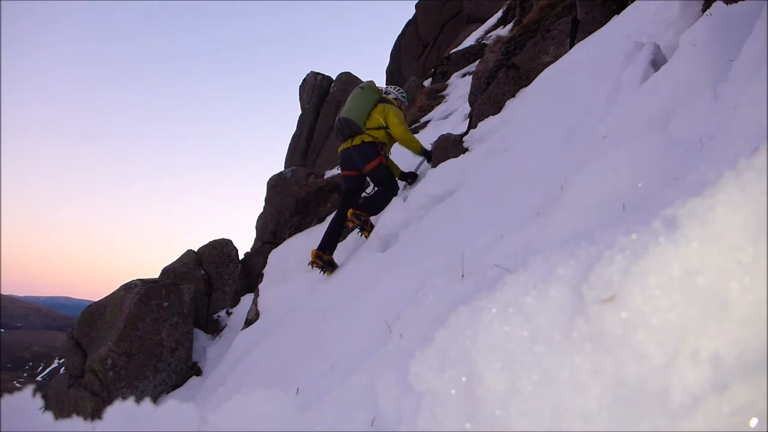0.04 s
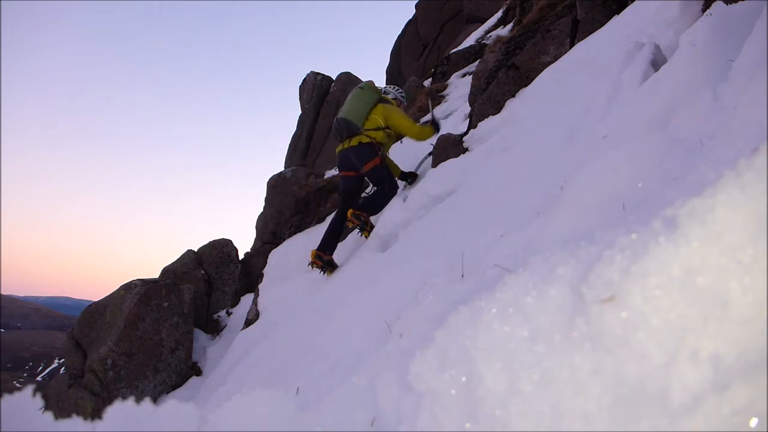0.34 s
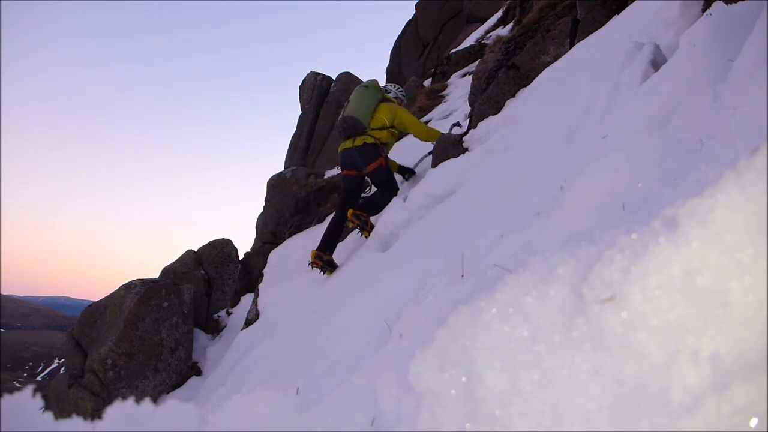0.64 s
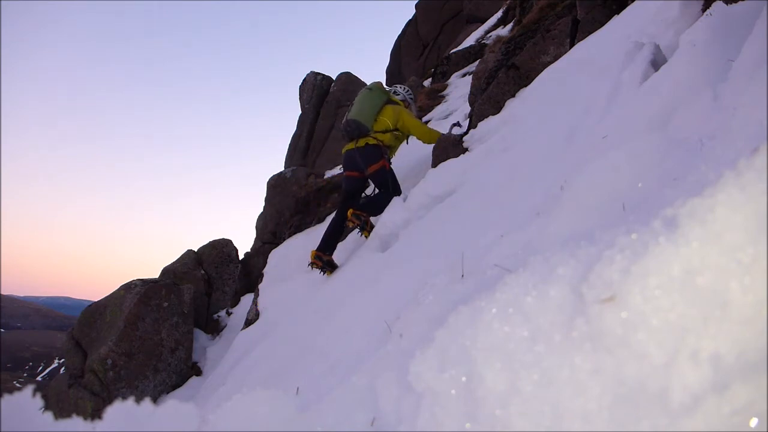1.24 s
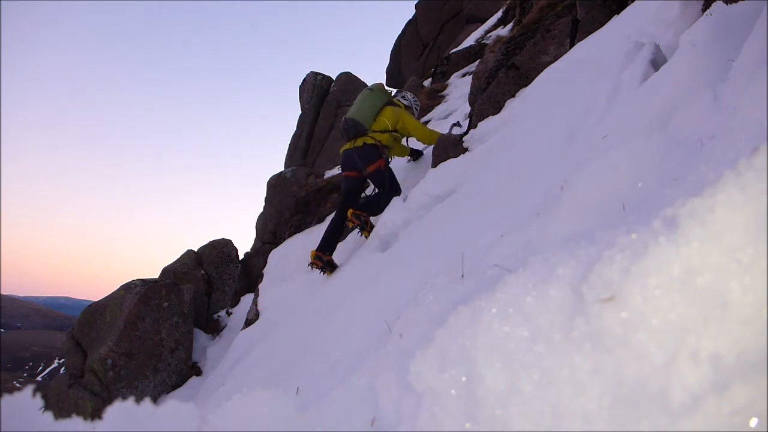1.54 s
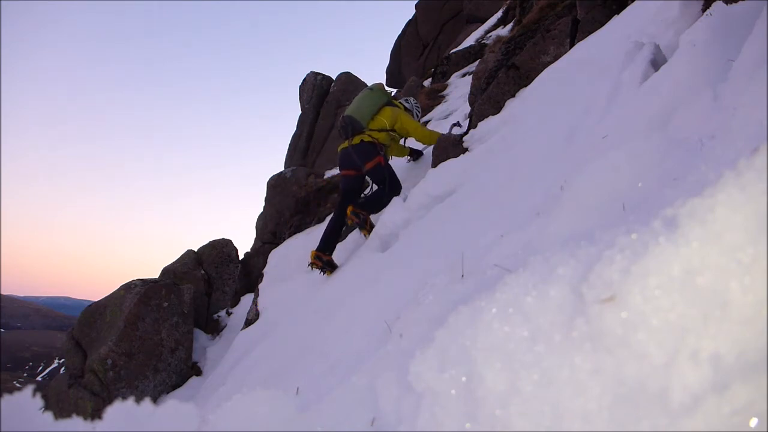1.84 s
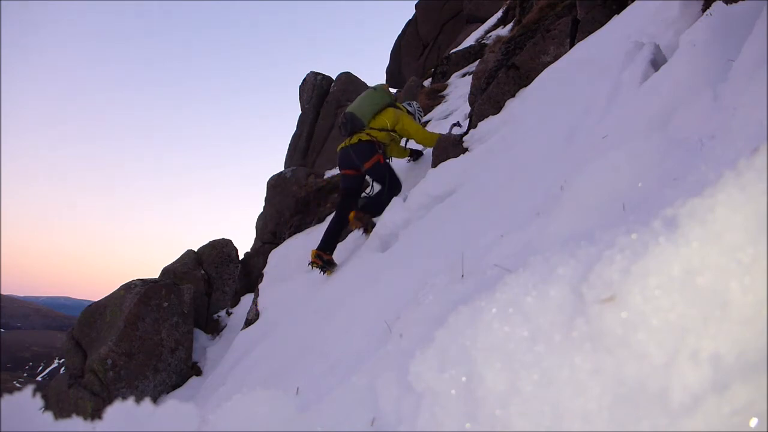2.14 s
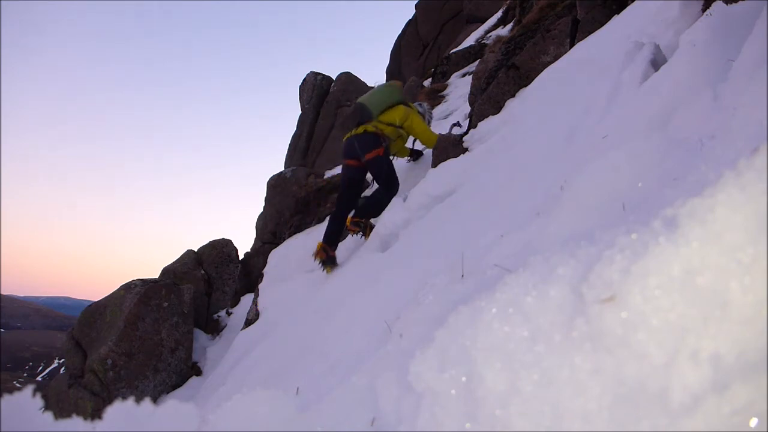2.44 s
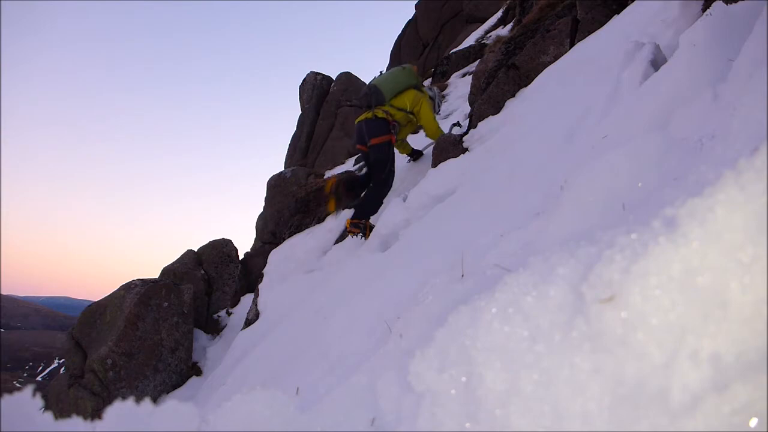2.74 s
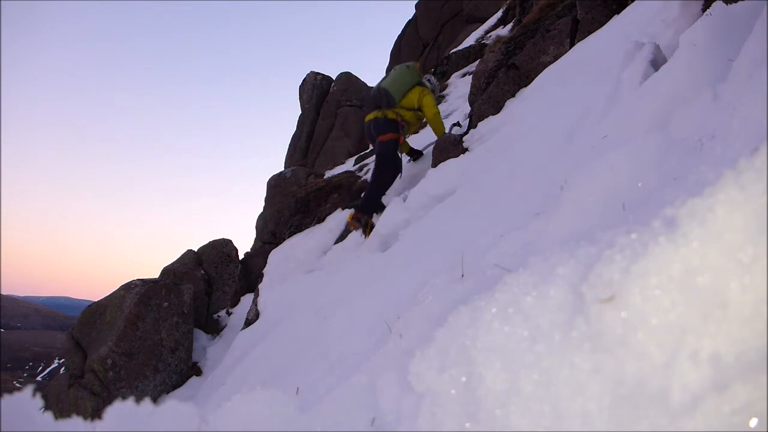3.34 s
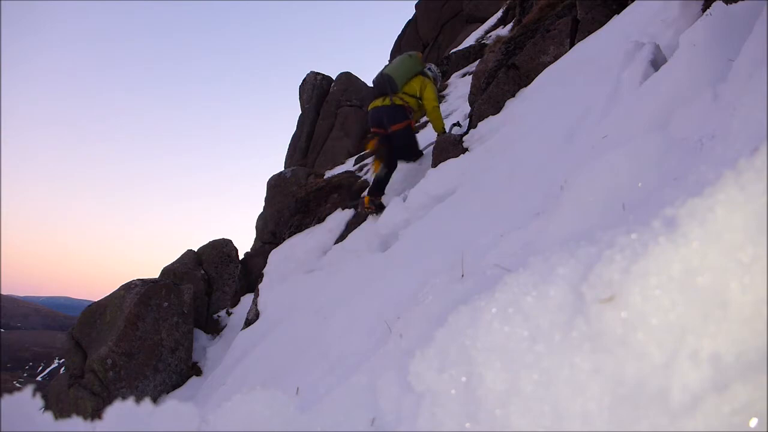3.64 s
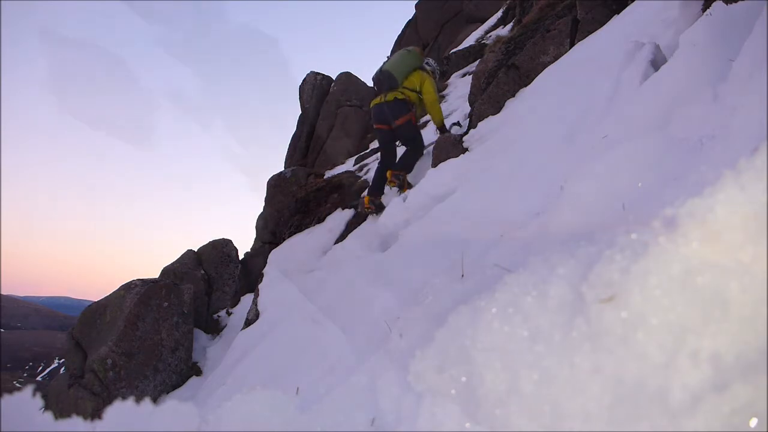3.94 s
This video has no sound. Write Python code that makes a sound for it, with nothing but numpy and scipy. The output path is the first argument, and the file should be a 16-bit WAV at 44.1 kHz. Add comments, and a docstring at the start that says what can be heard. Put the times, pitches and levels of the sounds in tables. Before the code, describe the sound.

Short crunches of an axe and boots climbing hard snow, with gusts thumping the microphone.

```python
"""Climbing firm snow in a gust

Some metres away axe picks bite, sleeves swish and crampons kick in. Each blow is a short run of
fractures in the crust that rings the steel. There are no walls to echo. Over a faint hush of
mountain air a gust arrives, and its eddies thump the two microphone ports."""
import sys
import numpy as np
from scipy import signal
from scipy.fft import rfft, irfft
from scipy.io import wavfile
from scipy.ndimage import uniform_filter1d

SR = 44100
rng = np.random.default_rng(int(sys.argv[2]) if len(sys.argv) > 2 else 0)


def wav_record(signal):
    """Record a signal, one row per channel, as 16-bit PCM in the file named by sys.argv[1]."""
    frames = np.transpose(np.atleast_2d(signal))
    bounded = np.clip(frames, -1, 1)
    # unit amplitude maps onto the largest positive 16-bit level
    quanta = np.round(bounded * 32767).astype(np.int16)
    wavfile.write(sys.argv[1], SR, quanta)


N = 176400

# Spectrum of distant wind. Each row: frequency in Hz, relative spectral level in dB.
AIR_SPECTRUM = [(30, -18.5), (90, -16), (170, -13.5), (320, -3.5), (500, -7.5), (1100, -13.5), (1500, -18),
                (2900, -25), (6000, -33.5), (10700, -35), (13000, -42.5), (15000, -43)]
# Stereo width of that wind. Each row: frequency in Hz, side minus mid in dB.
AIR_WIDTH = [(60, -4), (110, -9.5), (200, -11.5), (380, -9.5), (700, 0.5), (1290, 6), (2380, 2.5),
             (4390, -1), (8110, -3), (15000, 0)]
# Blows of the axe. Each row: start in seconds, level in dB, hold in seconds, snow body in dB,
# snow treble in dB, relative steel ring in dB, most strongly excited frequency in Hz.
PICK_BLOWS = [(0.061, -59.5, 0.01, -11, 2, -23, 3250), (0.137, -51.5, 0.0069, -33, 0.5, -5, 3330),
              (0.639, -54, 0.0061, 4.5, 4, 0, 1820), (0.653, -55.5, 0.012, 4, -13, -8, 1810),
              (0.66, -52, 0.0028, -7, 10.5, 1, 4970), (1.094, -56, 0.011, -42, -0.5, -3.5, 2150),
              (1.5699, -36, 0.0039, -39, -7, 2.5, 2660), (1.58, -50, 0.0043, -2, 11, 2, 2150),
              (1.608, -68, .003, -6, 1, -4, 2720), (1.732, -55, 0.00089, -18, -20, -14, 2720)]
# Spectrum of breaking crust. Each row: frequency in Hz, relative spectral level in dB.
CRUST_SPECTRUM = [(100, -17), (300, 8.5), (700, 4.5), (1300, 4), (2200, 1), (3500, 0), (4800, -6),
                  (7000, -12), (11000, -13), (13000, -33), (15000, -29)]
# Modes of the axe head. Each row: frequency in Hz, relative level in dB, 60 dB decay time in seconds.
AXE_HEAD_MODES = [(1033, -12, 0.038), (1813, -8, 0.034), (2143, -8.5, .03), (2704, -11.5, 0.027),
                  (2790, -9.5, 0.036), (3317, -2.5, 0.028), (4010, -7, .025), (5000, -11, 0.017),
                  (5410, -6.5, 0.02), (6160, -10, .03), (6640, -9.5, 0.038)]
# Swishes of cloth and loose snow. Each row: peak time in seconds, level in dB, rise in seconds,
# fall in seconds, treble in dB.
SLEEVE_MOVES = [(.13, -65.5, .08, 0.046, 0.5), (.815, -59, 0.067, 0.054, 2),
                (1.09, -67.5, 0.064, 0.015, -3), (1.954, -60, 0.023, 0.018, 4),
                (2.349, -67, 0.12, .08, -17), (2.505, -59, 0.056, 0.055, -1.5),
                (2.58, -63, 0.026, 0.017, 0), (2.77, -70.5, 0.049, 0.087, 4),
                (3.41, -63.5, 0.034, 0.012, 2.5), (3.532, -62.5, 0.084, 0.031, 7.5),
                (3.97, -59.5, 0.19, .08, -1)]
# Spectrum of rubbing cloth. Each row: frequency in Hz, relative spectral level in dB.
CLOTH_SPECTRUM = [(200, -32), (700, 5), (1500, 0.5), (3000, -1.5), (4500, -7.5), (7000, -13.5),
                  (11000, -11.5), (14000, -38)]
# Eddies at the ports. Each row: peak time in seconds, relative level in dB, pitch in Hz,
# left minus right in dB.
PORT_EDDIES = [(0.816, -45.5, 108, 5), (.868, -44, 130, 26), (0.918, -34.5, 165, -11),
               (1.01, -42.5, 108, -1), (1.060, -46, 145, 23), (1.123, -41, 130, 1), (1.532, -40.5, 157, 12),
               (1.735, -41, 149, 12), (2.255, -25.5, 211, 14), (2.452, -41, 144, 7), (2.528, -32, 168, 10),
               (2.639, -26.5, 220, 14), (2.654, -19, 208, 16), (2.663, -23.5, 406, 23),
               (2.669, -25, 189, -5), (2.677, -21, 200, 10), (2.688, -13, 230, -10),
               (2.695, -18.5, 518, -35), (2.705, -19.5, 200, -5), (2.742, -25.5, 297, 16),
               (2.751, -21, 269, -16), (2.758, -18.5, 241, -12), (2.797, -26.5, 278, 12),
               (2.826, -22.5, 250, -20), (2.837, -25.5, 231, -7), (2.881, -33.5, 192, 8),
               (2.973, -37.5, 139, 8), (3.007, -29.5, 157, 12), (3.114, -31, 190, 2), (3.153, -36, 198, 12),
               (3.18, -20.5, 240, 6), (3.2, -28, 250, 7), (3.239, -17.5, 179.5, -6),
               (3.294, -23.5, 213, 16), (3.316, -26, 211, 4), (3.34, -20.5, 146, 4.5),
               (3.356, -24, 187, -23), (3.372, -34, 170, 6), (3.441, -21, 215, 5.5),
               (3.51, -30.5, 183, -18), (3.594, -32, 164, 16), (3.608, -29, 186, 13),
               (3.654, -26.5, 170, 9), (3.938, -19, 248, -8), (3.945, -12.5, 281, -14),
               (3.959, -8.5, 210, 0), (3.975, -10, 230, 12), (3.987, -38, 170, 14)]
# Strength of the buffeting between eddies. Each row: time in seconds, level in dB.
GUST_ENVELOPE = [(0, -92), (.65, -68), (.82, -59.5), (1.12, -55.5), (1.2, -69.5), (1.49, -79), (1.591, -49),
                 (1.68, -78), (2.4, -64.5), (2.6, -44.5), (2.68, -32), (2.86, -41), (2.92, -57.5),
                 (3.2, -41), (3.33, -37.5), (3.47, -41), (3.55, -43), (3.64, -44.5), (3.69, -59),
                 (3.78, -59), (3.85, -42.5), (3.928, -51.5), (3.944, -25), (4, -29)]
# Spectrum of the buffeting. Each row: frequency in Hz, relative spectral level in dB.
BUFFET_SPECTRUM = [(25, -41), (50, -14.5), (100, 6), (190, 1.5), (320, -10), (450, -19.5), (700, -27),
                   (1500, -61), (15000, -74)]
# Kicks of the boots. Each row: start in seconds, level in dB, rise in seconds, hold in seconds,
# snow body in dB, snow treble in dB, crampon frequency in Hz, relative crampon ring in dB.
BOOT_KICKS = [(2.212, -44, 0.0084, 0.0098, 1.5, 8, 2580, -5),
              (2.235, -56.5, 0.0042, 0.01, 13.5, 10, 2310, -9),
              (2.62, -55, 0.0038, 0.0046, 5, 2.5, 1440, -10),
              (3.039, -44.5, 0.0096, 0.017, 9, 2, 1954, -12.5),
              (3.099, -59, 0.00087, .003, 17, 1, 2300, -13), (3.246, -63.5, .002, 0.0071, 3, 4, 2140, -14),
              (3.862, -42.5, 0.0012, 0.012, -2, 9, 2230, -5),
              (3.871, -35, 0.0022, 0.0066, -7, 0, 2780, -14)]

BODY_HZ, TREBLE_HZ = 1080, 5000
FRACTURES_PER_S, FRACTURE_SPREAD_DB = 6000, 4
AIR_DB, AIR_FLICKER_DB = -61, 0.56
AXE_RISE_S, AXE_FALL_S, FOCUS_DB, FOCUS_OCTAVES = 0.0022, 0.0067, 8, 0.15
SCATTER_DB, SCATTER_FALL_S, CLIMBER_PAN_DB = -8, 0.0084, 1.5
SWISH_FLICKER_DB = 2.2
EDDY_GAIN_DB, EDDY_HALF_WIDTH_RAD, LOW_CUT_HZ, LOW_CUT_Q = -2, 2.88, 111.6, 1.56
BUFFET_PAN_DB, BUFFET_COHERENCE, BUFFET_FLICKER_DB = 4.5, 0.36, 5.5
KICK_FALL_S, CRAMPON_T60_S = 0.0064, 0.018
CRUMBLE_DB, CRUMBS_DB, CRUMBS_FALL_S = 0.9, -23.5, 0.079
NOTCH_HZ, NOTCH_WIDTH_HZ, ROLL_OFF_HZ, TOP_HZ = 9080, 1150, 12030, 15500


def undb(db):
    """Amplitude ratio of a level in decibels."""
    return 10 ** (np.asarray(db) / 20)


def unit(x):
    """Normalisation to an rms of 1."""
    return x / np.sqrt(np.mean(x ** 2) + 1e-20)


def gains(points):
    """Magnitude response through (Hz, dB) points, interpolated in log frequency."""
    hz, db = np.array(points, float).T
    bin_hz = np.arange(N // 2 + 1) * SR / N
    return undb(np.interp(np.log(bin_hz + 1), np.log(hz), db))


def colour(x, points):
    """Spectral shaping by (Hz, dB) points, at unit rms."""
    return unit(irfft(rfft(x) * gains(points), N))


def shelves(x, body_db, treble_db):
    """Shelving filters lift or lower the two ends of the spectrum."""
    hz = np.arange(N // 2 + 1) * SR / N
    lows = 1 / (1 + (hz / BODY_HZ) ** 4)
    highs = 1 - 1 / (1 + (hz / TREBLE_HZ) ** 4)
    return irfft(rfft(x) * undb(body_db * lows + treble_db * highs), N)


def wander(rate_hz):
    """Random modulation: smoothed Gaussian steps at unit rms."""
    step = int(SR / rate_hz)
    stairs = np.repeat(rng.standard_normal(N // step + 1), step)
    return unit(uniform_filter1d(stairs, step)[:N])


def ring(x, hz, t60):
    """Forced response of one damped mode, scaled so that white noise keeps its level."""
    radius = np.exp(-np.log(1000) / (t60 * SR))
    feedback = [1, -2 * radius * np.cos(2 * np.pi * hz / SR), radius ** 2]
    return signal.lfilter([1, 0, -1], feedback, x) * np.sqrt((1 - radius ** 2) / 2)


def pan(x, db):
    """Equal-power panning by a level difference, left minus right."""
    return x * unit(undb(np.array([[db], [-db]]) / 2))


def air():
    """Distant wind is steady broadband noise; independent mid and side signals make it wide."""
    mid = colour(rng.standard_normal(N), AIR_SPECTRUM)
    side = colour(rng.standard_normal(N), AIR_SPECTRUM)
    side = irfft(rfft(side) * gains(AIR_WIDTH), N)
    return np.array([mid + side, mid - side]) * undb(AIR_DB + AIR_FLICKER_DB * wander(rate_hz=6.34))


def fractures():
    """Shot noise: tiny cracks form a dense Poisson train of impulses of uneven size."""
    happens = rng.random(N) < FRACTURES_PER_S / SR
    polarity = rng.choice([-1, 1], N)
    size = undb(FRACTURE_SPREAD_DB * np.minimum(rng.exponential(size=N), 4))
    return unit(happens * polarity * size)


def bite(start, rise, hold, fall):
    """Force envelope of steel entering snow: linear rise, hold, exponential decay."""
    t = np.arange(N) / SR - start
    return np.clip(t / rise, 0, 1) * np.exp(-np.clip((t - rise - hold) / fall, 0, 50))


def axe():
    """Brittle fracture of the crust drives the modes of the axe head; each blow favours one band."""
    snow, steel = 0, 0
    for start, db, hold, body_db, treble_db, ring_db, focus_hz in PICK_BLOWS:
        cracks = fractures()
        force = undb(db) * bite(start, AXE_RISE_S, hold, AXE_FALL_S)
        snow += force * shelves(colour(cracks, CRUST_SPECTRUM), body_db, treble_db)
        for hz, mode_db, t60 in AXE_HEAD_MODES:
            favour_db = FOCUS_DB * np.exp(-(np.log2(hz / focus_hz) / FOCUS_OCTAVES) ** 2)
            steel += undb(ring_db + mode_db + favour_db) * ring(force * cracks, hz, t60)
    return snow + steel / 2


def slope_scatter(direct):
    """Diffuse scattering from snow and rocks adds a very short tail, different at each ear."""
    t = np.arange(SR // 5) / SR
    tail = rng.standard_normal((2, len(t))) * np.exp(-t / SCATTER_FALL_S)
    tail /= np.sqrt(np.sum(tail ** 2, axis=1, keepdims=True))
    scattered = signal.fftconvolve(direct[None], tail, axes=1)[:, :N]
    return pan(direct, CLIMBER_PAN_DB) + undb(SCATTER_DB) * scattered


def swishes():
    """Friction noise of cloth and loose snow swells and fades with each move."""
    t, out = np.arange(N) / SR, 0
    for peak, db, rise, fall, treble_db in SLEEVE_MOVES:
        width = np.where(t < peak, rise, fall)
        swell = np.exp(-np.abs((t - peak) / width) ** 1.4)
        rubbing = shelves(colour(fractures(), CLOTH_SPECTRUM), 0, treble_db)
        out += undb(db) * swell * rubbing
    return out * undb(SWISH_FLICKER_DB * wander(rate_hz=81))


def eddies():
    """Each eddy is a brief pressure oscillation that rings the microphone's resonant low cut."""
    t, pressure = np.arange(N) / SR, 0
    for peak, db, hz, pan_db in PORT_EDDIES:
        phase = 2 * np.pi * hz * (t - peak)
        swell = np.exp(-np.minimum((phase / EDDY_HALF_WIDTH_RAD) ** 2, 20))
        pressure += pan(undb(db + EDDY_GAIN_DB) * swell * np.cos(phase), pan_db)
    omega = 2 * np.pi * LOW_CUT_HZ
    low_cut = signal.bilinear([1, 0, 0], [1, omega / LOW_CUT_Q, omega ** 2], SR)
    return signal.lfilter(*low_cut, pressure)


def buffeting():
    """Small-scale turbulence makes a restless rumble, partly coherent between the two ports."""
    times, levels_db = np.array(GUST_ENVELOPE).T
    gust = undb(np.interp(np.arange(N) / SR, times, levels_db))
    common = np.sqrt(BUFFET_COHERENCE) * rng.standard_normal(N)
    separate = np.sqrt(1 - BUFFET_COHERENCE) * rng.standard_normal((2, N))
    ports = np.array([colour(common + own, BUFFET_SPECTRUM) for own in separate])
    flicker = unit(undb(BUFFET_FLICKER_DB * np.tanh(wander(rate_hz=70))))
    return pan(ports * gust * flicker, BUFFET_PAN_DB)


def boots():
    """Uneven fracture under the front points excites one crampon mode; crumbs trickle after."""
    out = 0
    crumble = unit(undb(CRUMBLE_DB * wander(rate_hz=350)))
    for start, db, rise, hold, body_db, treble_db, hz, ring_db in BOOT_KICKS:
        cracks = fractures()
        force = undb(db) * crumble * bite(start, rise, hold, KICK_FALL_S)
        crumbs = undb(db + CRUMBS_DB) * bite(start, rise, hold, CRUMBS_FALL_S)
        snow = (force + crumbs) * shelves(colour(cracks, CRUST_SPECTRUM), body_db, treble_db)
        out += snow + undb(ring_db) * ring(force * cracks, hz, CRAMPON_T60_S)
    return out


def scene():
    """Superposition of climber and wind; only the climber's sound is scattered by the slope."""
    climber = axe() + boots() + swishes()
    return slope_scatter(climber) + eddies() + buffeting() + air()


def record(dry):
    """The camera's frequency response: a deep treble notch, a roll-off and a steep cut at the top."""
    notch = signal.iirnotch(NOTCH_HZ, NOTCH_HZ / NOTCH_WIDTH_HZ, SR)
    notched = signal.lfilter(*notch, signal.lfilter(*notch, dry))
    dulled = signal.lfilter(*signal.butter(2, ROLL_OFF_HZ, fs=SR), notched)
    return signal.sosfilt(signal.ellip(8, .2, 70, TOP_HZ, fs=SR, output="sos"), dulled)


dry = scene()
out = record(dry)
wav_record(out)
```